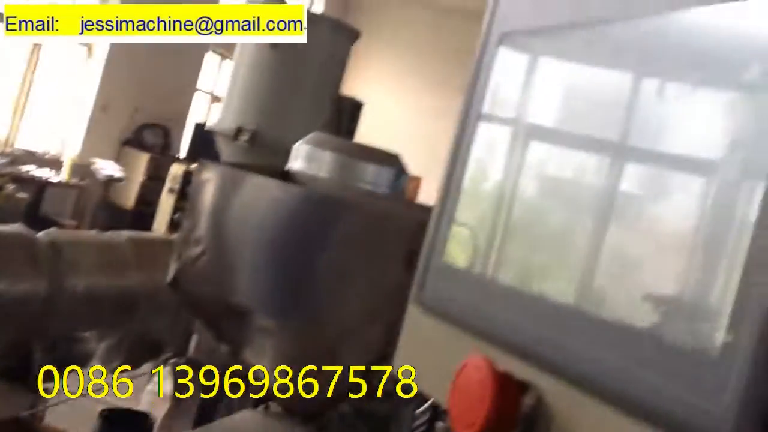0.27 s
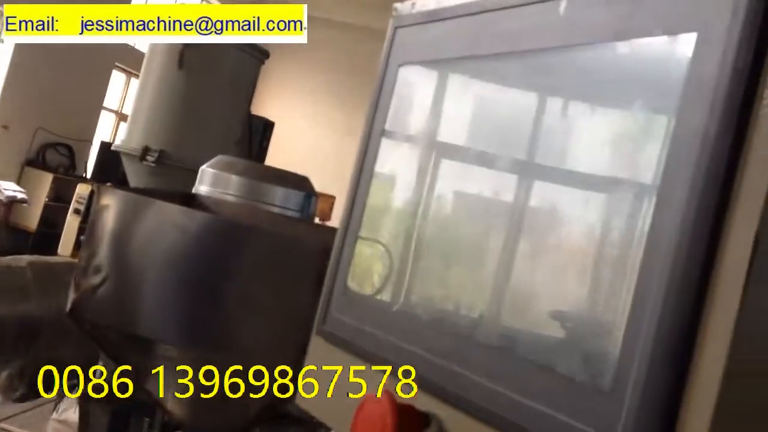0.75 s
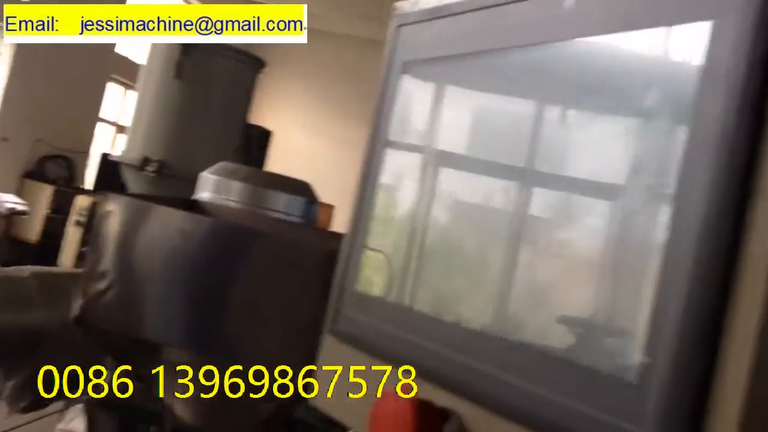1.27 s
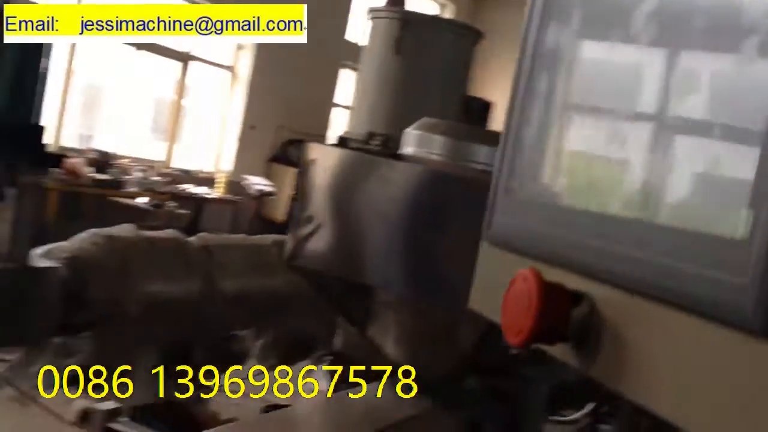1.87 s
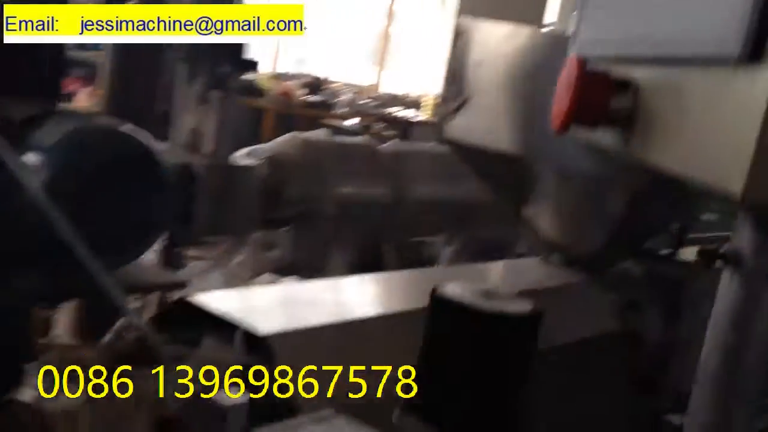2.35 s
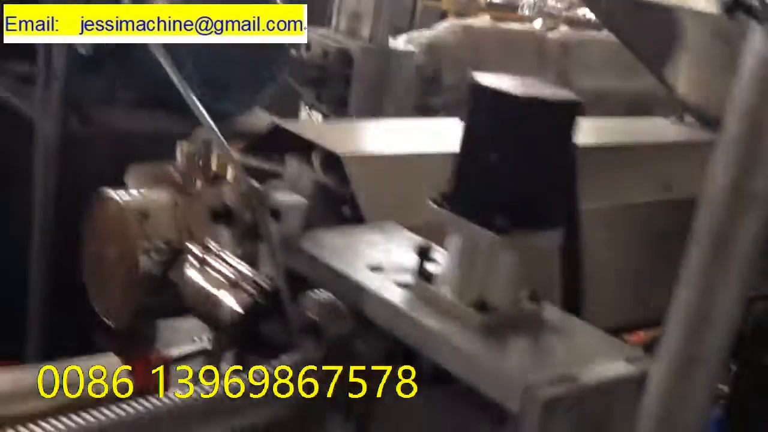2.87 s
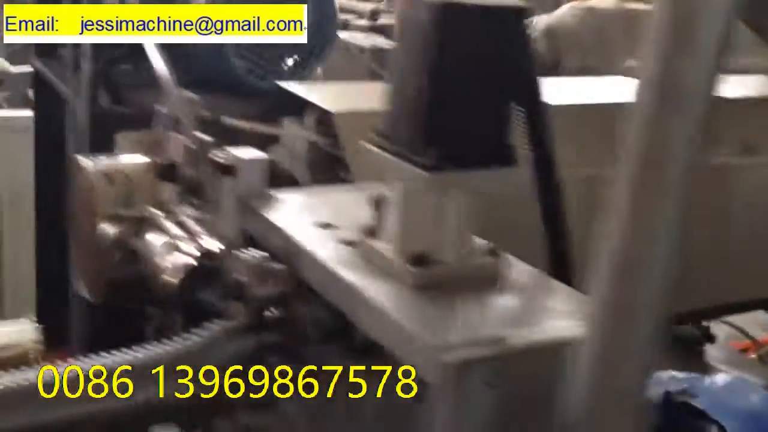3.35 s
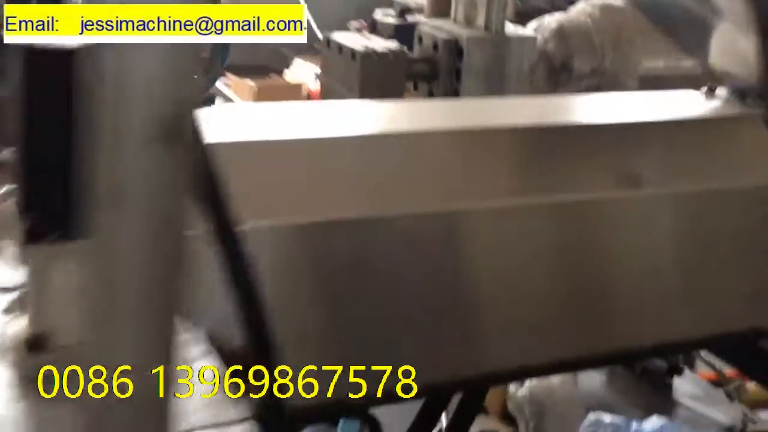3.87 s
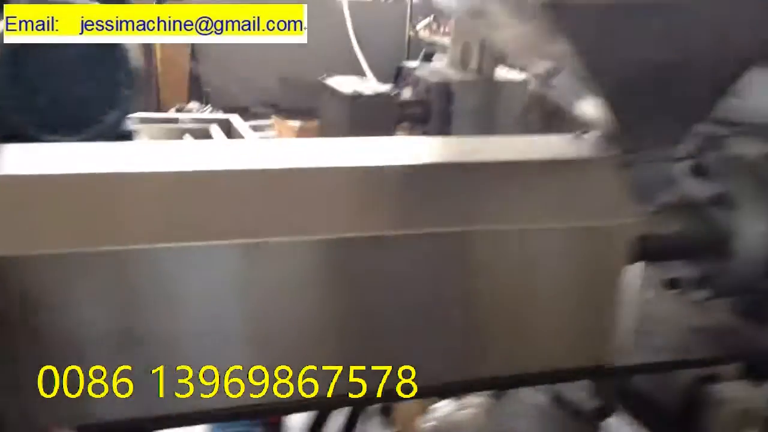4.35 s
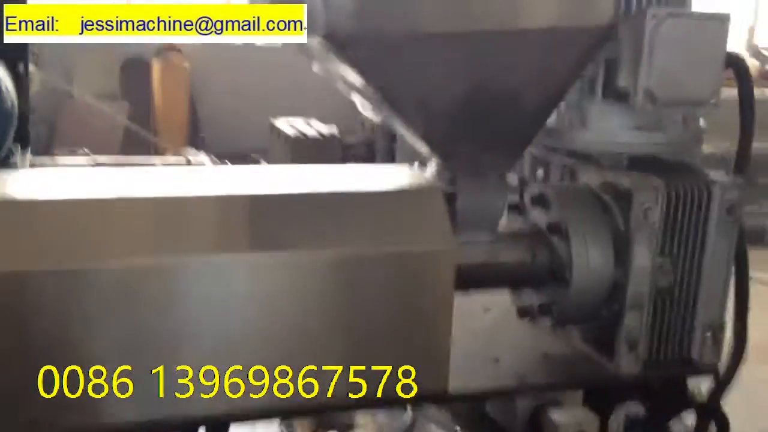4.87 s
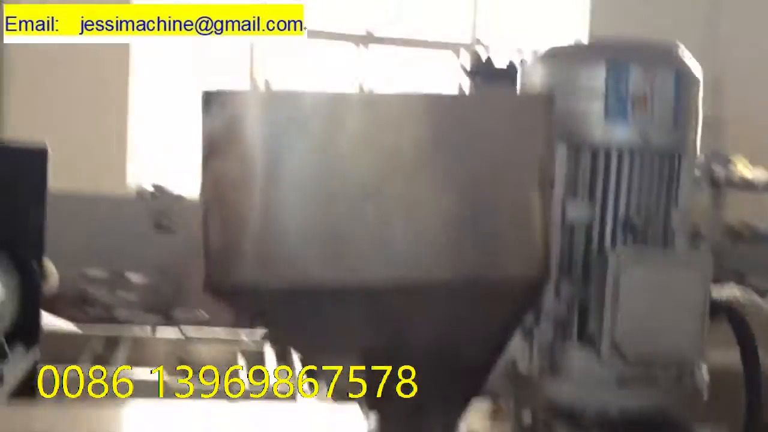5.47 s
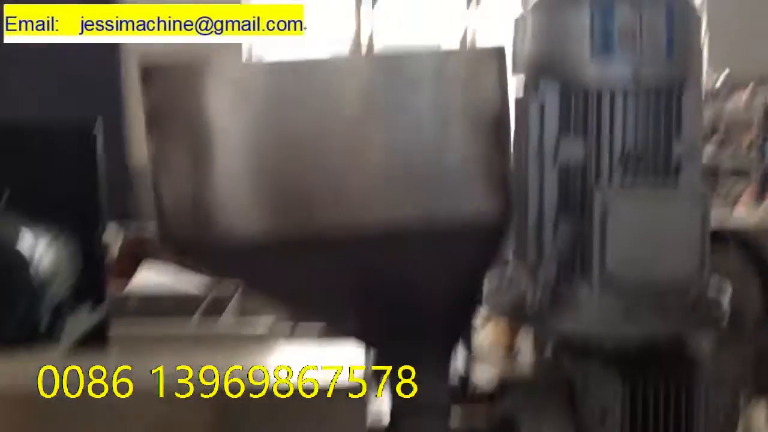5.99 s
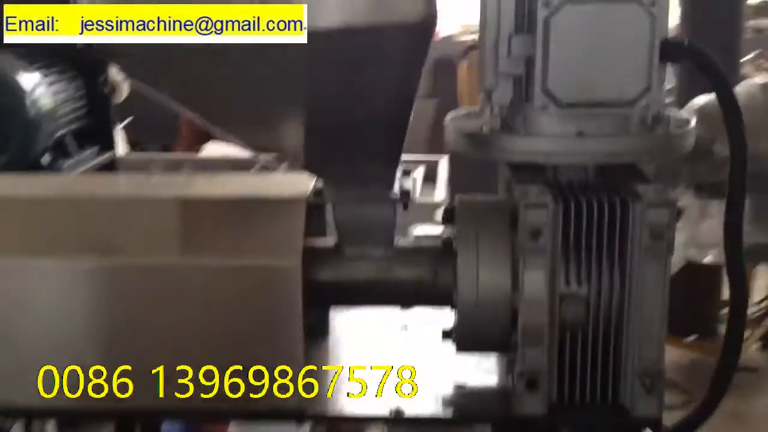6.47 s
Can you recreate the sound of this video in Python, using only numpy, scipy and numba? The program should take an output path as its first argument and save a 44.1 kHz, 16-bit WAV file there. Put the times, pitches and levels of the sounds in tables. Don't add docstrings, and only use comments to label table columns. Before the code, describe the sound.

Dense extrusion-line noise: booming blower, gear and fan roar, airy hiss and faint motor whine, bumped once, then cut out for a third of a second.

```python
import sys
import numpy as np
from scipy import signal
from scipy.fft import rfft, irfft, next_fast_len
from scipy.io import wavfile
from scipy.ndimage import uniform_filter1d
from numba import njit

SR = 44100
rng = np.random.default_rng(int(sys.argv[2]) if len(sys.argv) > 2 else 0)


def voltage_ratio(decibels):
    exponent = np.asarray(decibels, float) / 20
    return 10 ** exponent


def bounce(signal):
    frames = np.transpose(np.atleast_2d(signal))
    limited = np.clip(frames, -1, 1)
    pcm = np.round(limited * 32767).astype(np.int16)
    wavfile.write(sys.argv[1], SR, pcm)


N = 296793
FRAME, GRID = 2048, 191


def columns(table):
    rows = np.asarray(table, float)
    return [np.interp(np.arange(N) / SR, rows[:, 0], c) for c in rows[:, 1:].T]


def unit(x):
    return x / np.sqrt(np.mean(x ** 2))


def walk(rate):
    hold = int(SR / rate)
    steps = np.repeat(rng.standard_normal(N // hold + 1), hold)
    slewed = uniform_filter1d(uniform_filter1d(steps, hold), hold)
    return unit(slewed[:N])


@njit
def svf(x, hz, width):
    y, band, low = np.empty(len(x)), 0., 0.
    for i in range(len(x)):
        g, damping = np.tan(np.pi * hz[i] / SR), width / hz[i]
        v = (band + g * (x[i] - low)) / (1 + g * (g + damping))
        band, low = 2 * v - band, low + 2 * g * v
        y[i] = damping * v
    return y


def turbulence(colour, flicker_db, rate, count):
    size = next_fast_len(N)
    octave = np.log2(np.maximum(np.arange(size // 2 + 1) * SR / size, 1))
    hz, db = np.transpose(colour)
    gain = voltage_ratio(np.interp(octave, np.log2(hz), db, left=-120, right=-120))
    spectrum = rfft(rng.standard_normal(size)) * gain
    centres = np.linspace(np.log2(hz[0]), np.log2(hz[-1]), count)
    out = 0
    for share in np.eye(count):
        band = irfft(spectrum * np.interp(octave, centres, share), size)[:N]
        out = out + band * voltage_ratio(flicker_db * walk(rate))
    return unit(out)


def lapped(x, change, start=0):
    half = FRAME // 2
    n = np.arange(FRAME) + .5
    window = np.sin(np.pi * n / FRAME)
    waves = np.cos(np.pi / half * np.outer(n[:half], n + half / 2))
    basis = window * waves * np.sqrt(2 / half)
    blocks = np.pad(x, (FRAME - start, -(len(x) - start) % half + half)).reshape(-1, half)
    lines = np.hstack([blocks[:-1], blocks[1:]]) @ basis.T
    frames = change(lines) @ basis
    out = frames[1:, :half] + frames[:-1, half:]
    return out.ravel()[half - start:][:len(x)]


# t/s, nearness/0-1
NEAR_DRIVE = [
    (0, 0.03),
    (2.2, 0.06),
    (3.2, .5),
    (4, 0.58),
    (4.6, 0.7),
    (5.6, 0.91),
    (6.73, 1.),
]


def nearness():
    return columns(NEAR_DRIVE)[0]


def placed(near, place_db):
    return np.interp(near, [0, .5, 1], place_db)


# f/Hz, level/dB per Hz
BLOWER = [(130, -23), (200, -9), (400, -7.5), (480, -10)]
# t/s, f/Hz, level/dB
HOUSING = [(0, 280, -27.5), (.9, 277, -27), (2, 278, -27.5), (3.1, 280, -29.5), (3.5, 304, -27.5),
           (3.9, 308, -26.5), (4.4, 300, -27.5), (4.7, 298, -26), (5.3, 290, -27), (5.6, 300, -28.5),
           (6.1, 294, -27.5), (6.4, 304, -25.5), (6.73, 300, -25)]


def blower(near):
    hz, db = columns(HOUSING)
    hz = hz + near * 14 * walk(16)
    db = db + .8 * walk(26)
    air = rng.standard_normal(N) * voltage_ratio(1.4 * walk(50))
    ridge = unit(svf(svf(air, 0.989 * hz, 50.0), 0.986 * hz, 65.0))
    boom = unit(svf(svf(rng.standard_normal(N), 0.98 * hz, 110.), 1.0 * hz, 130.))
    second = unit(svf(rng.standard_normal(N), 1.427 * hz, 40.))
    skirt = turbulence(BLOWER, 1.2, 12, count=3)
    return voltage_ratio(db) * unit(ridge + voltage_ratio(-1.0) * boom + voltage_ratio(-15) * second + voltage_ratio(-5) * skirt)


# f/Hz, level/dB per Hz
FANS = [(380, -20.5), (480, 3.5), (600, 0.5), (720, -3.5), (900, -18)]


def barrel_fans(near):
    nearest_s, pass_s = 1.22, 0.95
    t = np.arange(N) / SR
    passing = np.exp(-((t - nearest_s) / pass_s) ** 2 / 2)
    db = -40.5 + 7.5 * passing + 4.5 * near ** 4
    return voltage_ratio(db + 1.4 * walk(6)) * turbulence(FANS, 0.76, 8, count=3)


# f/Hz, level/dB per Hz
ROAR = [(420, -36.5), (700, -8), (800, -1.5), (1110, -2.5), (1320, -5.5), (1670, -6.5), (2010, -4.5),
        (2390, -6), (3230, -8.5), (3970, -8), (4960, -8.5), (5120, -26)]


def gear_roar(near):
    db = placed(near, (-30.4, -30.5, -28)) - 0.5
    return voltage_ratio(db) * turbulence(ROAR, .8, 9, count=9)


# f/Hz, level/dB per Hz
HISS = [(4850, -33.5), (5080, -5), (5700, -4.5), (6500, -2), (7400, 0), (9670, -1), (11000, -3),
        (13000, -4), (14500, -6.5), (15300, -10)]


def cooling_air(near):
    clear_s, clearing_s, unshade_db = 4.25, .2, 3.2
    clear = .5 + .5 * np.tanh((np.arange(N) / SR - clear_s) / clearing_s)
    db = placed(near, (-34, -34.8, -33.5)) + unshade_db * clear + 0.47
    return voltage_ratio(db) * turbulence(HISS, 0.78, 11, count=8)


def hall(lines, ripple_db=1.9, fade_hz=7000):
    hz = np.arange(FRAME // 2) * SR / FRAME
    ripple = uniform_filter1d(rng.standard_normal(lines.shape), size=12, axis=0)
    ripple = unit(uniform_filter1d(ripple, size=2, axis=1))
    gain = voltage_ratio(ripple_db / (1 + hz / fade_hz) * ripple)
    return lines * unit(gain)


# f/Hz, width/Hz, level/dB at the desk, level/dB along the barrel,
# level/dB beside the drive
COVERS = [(403, 45, -47, -38.5, -39), (791, 50, -49.5, -42.5, -43.5), (900, 34, -54.5, -49, -47),
          (976, 30, -47.5, -50, -53.5), (1092, 25, -54.5, -51.5, -50.5), (1150, 60, -64.5, -51.5, -46),
          (1264, 45, -55, -55.5, -42.5), (1684, 20, -55, -53.5, -46), (1803, 34, -53, -47, -46),
          (1970, 30, -53, -51, -46), (2054, 80, -48.5, -47.5, -43), (2148, 30, -56, -50.5, -51.5),
          (2633, 150, -45, -43.5, -44.5), (3634, 46, -55.5, -55, -52), (4240, 86, -60, -56, -49),
          (4430, 30, -55.5, -51, -49.5), (4750, 200, -52, -52.5, -46), (6670, 150, -53, -54, -53),
          (7920, 640, -54, -54, -49.5), (11930, 990, -56, -57.5, -49)]


def covers(near):
    out = 0
    for hz, width, *place_db in COVERS:
        centre = np.full(N, 1. * hz)
        ring = unit(svf(svf(rng.standard_normal(N), centre, 1. * width), centre, 2. * width))
        out = out + ring * voltage_ratio(placed(near, place_db) + 1.6 * walk(3.05))
    return out


def tone(hz, db, wobble_hz, flutter_db):
    phase = 2 * np.pi * np.cumsum(hz + wobble_hz * walk(30)) / SR
    return np.sqrt(2) * np.sin(phase) * voltage_ratio(db + flutter_db * walk(12))


# t/s, level/dB
WHINE = [(0, -51), (.7, -47), (.95, -40.5), (1.6, -42.5), (1.85, -55), (2.06, -38.5), (2.55, -45),
         (2.8, -56), (3, -42), (3.3, -44), (3.6, -55), (3.95, -42), (4.6, -50), (5.1, -46), (5.3, -56),
         (5.55, -42), (6.15, -37.5), (6.3, -51)]


def motors(near):
    whine_hz, whistle_hz = 2342.4, 9999

    def faded(place_db):
        return placed(near, place_db) + 2.6 * walk(13)

    whine = tone(whine_hz, columns(WHINE)[0] - .6, 1.2, 1.3)
    second = tone(2 * whine_hz, faded((-51, -49, -46)), 4.5, 2.5)
    fourth = tone(4 * whine_hz, faded((-58, -57, -49)), 7.0, 2.5)
    whistle = tone(whistle_hz, faded((-50, -49.5, -49)), 7.5, 2.2)
    return whine + second + fourth + whistle


# t/s, f/Hz, peak level/dB, length/s
BUMPS = [
    (0, 277, -18, 0.0056),
    (4.716, 80, -34, 0.02),
    (4.734, 175, -18.5, .034),
    (4.742, 60, -35, .02),
    (4.757, 127, -28.5, .03),
    (4.755, 310, -19, .034),
    (4.791, 150, -28.5, .032),
]


def bumps():
    out, t = 0, np.arange(N) / SR
    for s, hz, db, push in BUMPS:
        shape = np.sin(np.pi * np.clip((t - s) / push, 0, 1)) ** 2
        out = out + voltage_ratio(db) * shape * np.sin(2 * np.pi * hz * (t - s))
    return out


# f/Hz, level/dB
STEP = [(100, -70), (1000, -42), (4700, -33), (5100, -27.5), (6500, -28), (10000, -27), (12500, -27.5),
        (13800, -26), (15300, -29)]


def rounded(lines, scatter_db=2.5, dead=.38):
    hz = (np.arange(FRAME // 2) + .5) * SR / FRAME
    drift = uniform_filter1d(rng.standard_normal((len(lines), FRAME // 32)), size=3, axis=0)
    step_hz, step_db = np.transpose(STEP)
    usual_db = np.interp(np.log(hz), np.log(step_hz), step_db)
    step = voltage_ratio(usual_db + scatter_db * np.repeat(drift, 16, axis=1))
    count = np.floor((np.abs(lines) / step) ** .75 + dead)
    return np.sign(lines) * count ** (4 / 3) * step


FILL_S = [.209, .209, .627, 1.068, 1.858, 2.276, 2.439, 2.485, 3.186, 4.438, 4.508, 4.577, 4.624, 4.624,
          4.786, 4.786, 5.134, 5.181, 5.181, 5.274, 5.343, 5.436, 5.506, 5.552, 5.598, 6.619, 6.642]


def filled(lines, fill_db=-3.0):
    lowest_hz, span_hz, band_hz = 192 * SR / 2048, 9600, 32 * SR / 2048
    hz, side = np.arange(FRAME // 2) * SR / FRAME, np.zeros_like(lines)
    noise = rng.standard_normal(lines.shape)
    for s, (place, wide) in zip(FILL_S, rng.random((len(FILL_S), 2))):
        low_hz = lowest_hz + band_hz * np.floor(place ** 1.4 * span_hz / band_hz)
        high_hz = low_hz + band_hz * (2 + (wide > .7))
        band = (hz > low_hz - 1) & (hz < high_hz - 1)
        frame = round((s * SR - GRID) * 2 / FRAME) + 1
        spread = np.std(lines[frame - 2:frame + 1, band])
        side[frame, band] = voltage_ratio(fill_db) * spread * noise[frame, band]
    return side


# t/s, level/dB
SMEAR = [(0, -16), (.009, -21), (.012, -32), (.03, -37), (.037, -70)]


def dropout(mono):
    drop_s, back_s, cut_s = 5.6105, 5.9282, .002
    t = np.arange(N) / SR
    after, smear_db = np.transpose(SMEAR)
    gap = voltage_ratio(np.interp(t - drop_s, after, smear_db, right=-110))
    gap = gap + voltage_ratio(-50) * (t > back_s - .004)
    smear = signal.sosfilt(signal.butter(1, 700., "high", fs=SR, output="sos"), mono) * gap
    cut = mono * np.clip(1 - (t - drop_s) / cut_s, 0, 1)
    return np.where((t > drop_s) & (t < back_s), smear + cut, mono)


def scene():
    near = nearness()
    air = barrel_fans(near) + gear_roar(near) + cooling_air(near)
    mono = blower(near) + lapped(air, hall) + covers(near) + motors(near) + bumps()
    return np.array([mono, mono])


def roll_off(x):
    return signal.sosfilt(signal.butter(12, 16450, fs=SR, output="sos"), x)


def record(dry):
    mono = signal.sosfilt(signal.butter(3, 88., "high", fs=SR, output="sos"), dry[0])
    mono = lapped(mono, rounded)
    side = lapped(mono, filled, start=GRID)
    mono = dropout(mono)
    mono = signal.sosfilt(signal.ellip(10, .2, 80, 15260, fs=SR, output="sos"), mono)
    return roll_off(np.array([mono + side, mono - side]))


dry = scene()
out = record(dry)
bounce(out)
```